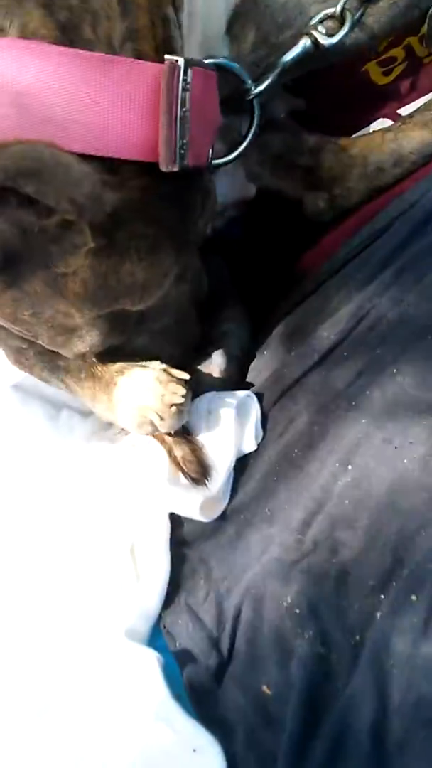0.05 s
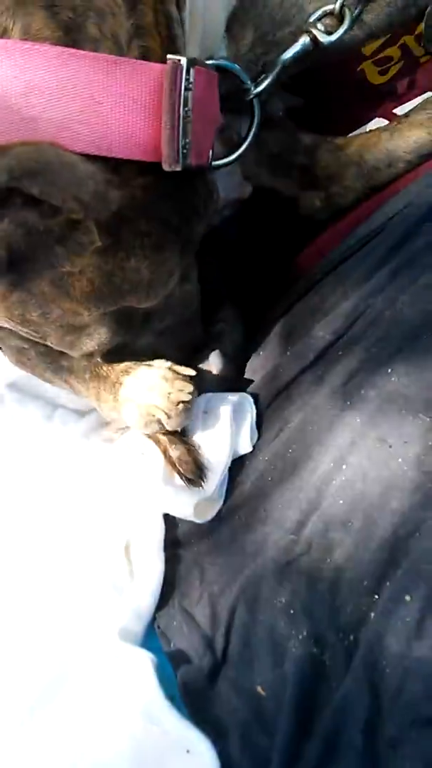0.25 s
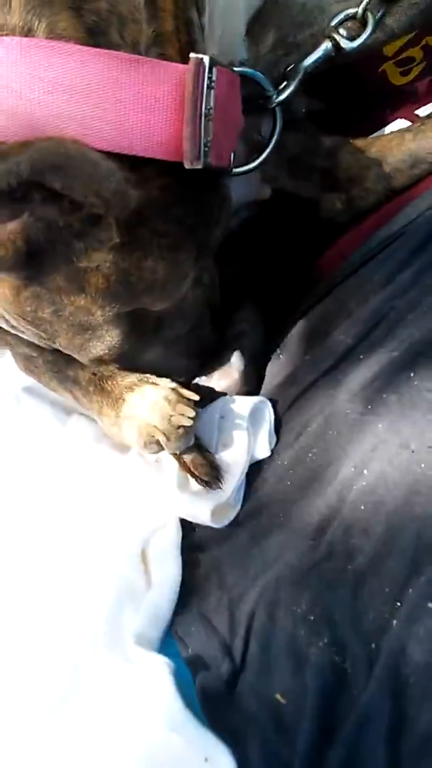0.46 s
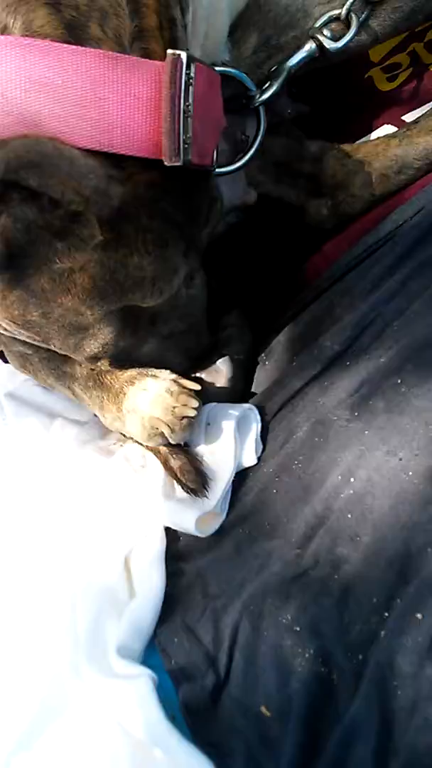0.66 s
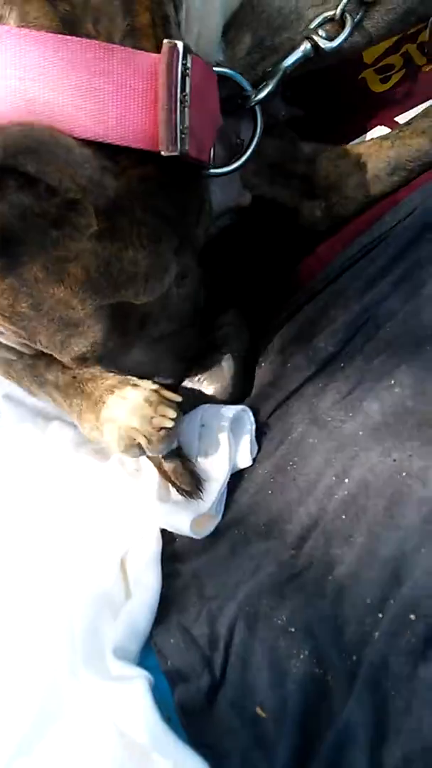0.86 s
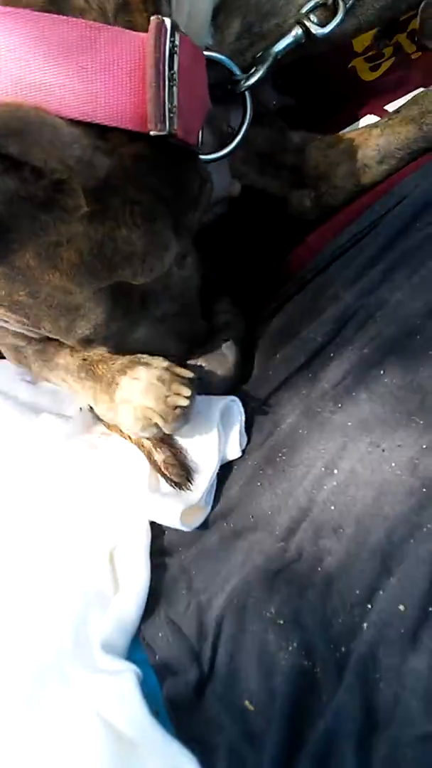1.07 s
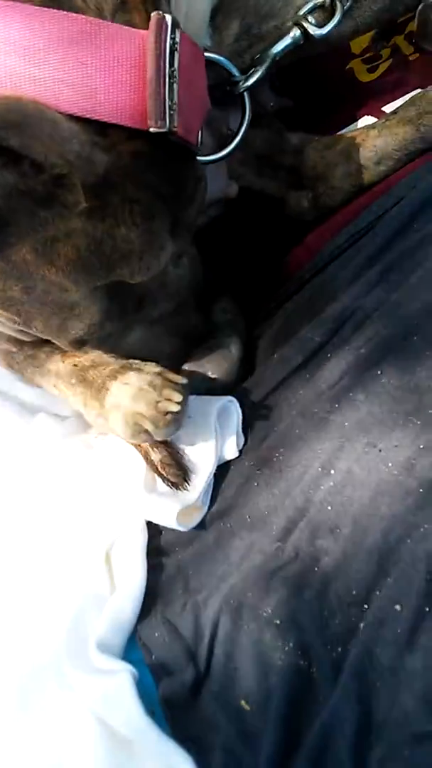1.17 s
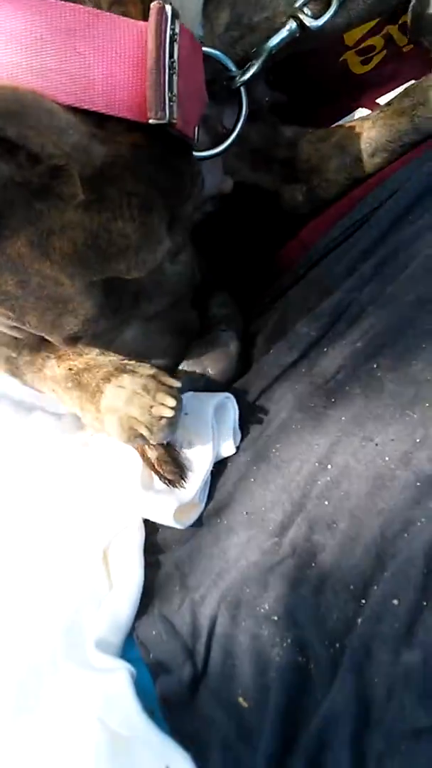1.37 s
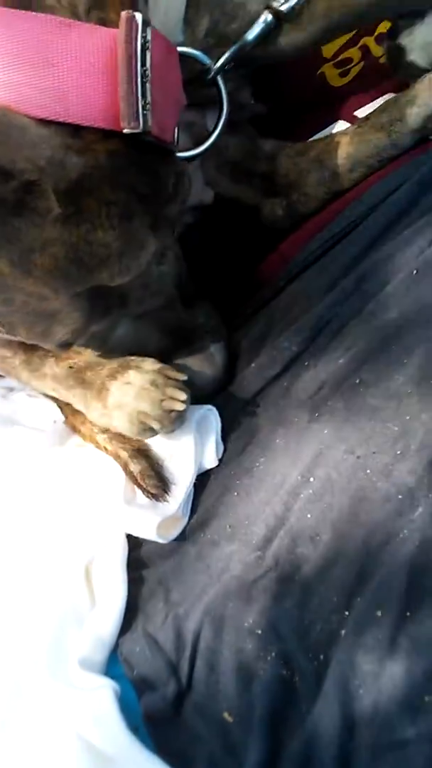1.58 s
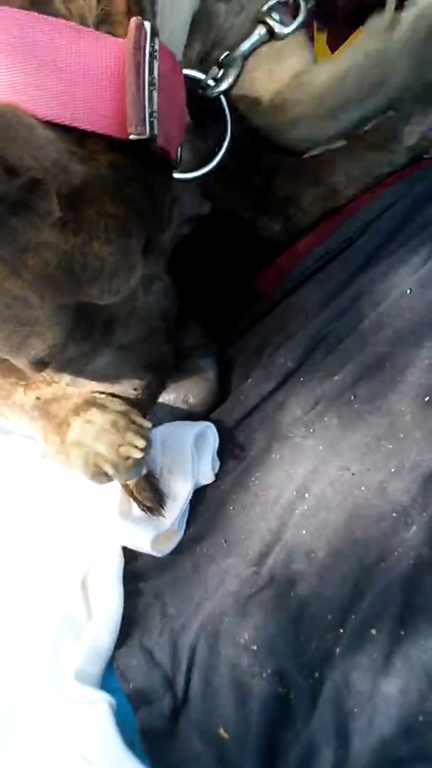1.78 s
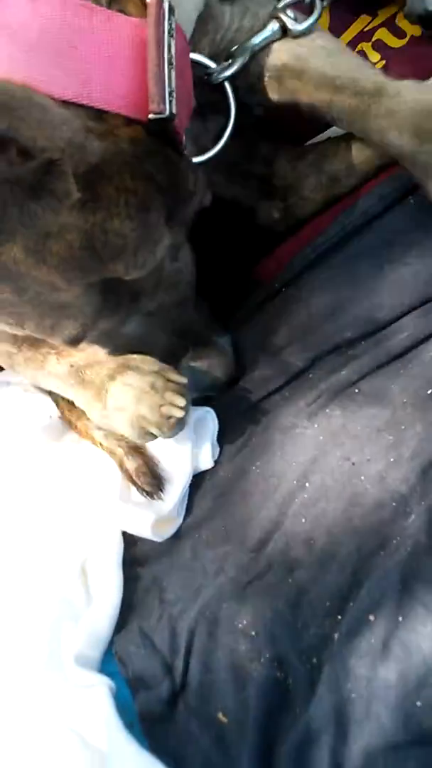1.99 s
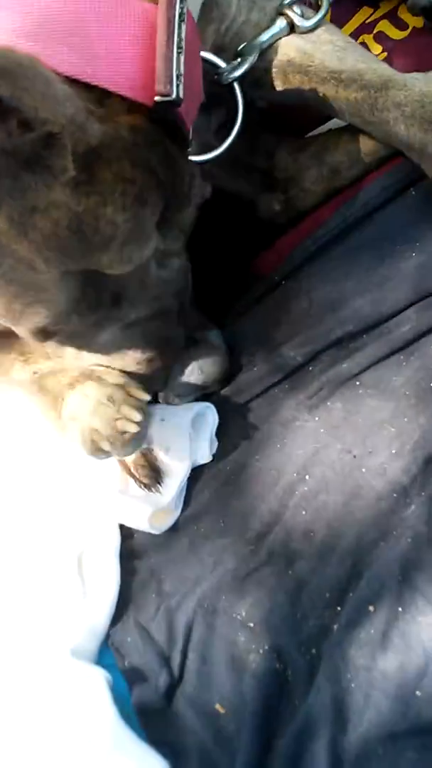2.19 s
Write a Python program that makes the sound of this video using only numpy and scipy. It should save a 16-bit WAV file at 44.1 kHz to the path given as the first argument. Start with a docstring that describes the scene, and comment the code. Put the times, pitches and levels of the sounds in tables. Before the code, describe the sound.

A dog licks very close to a phone microphone in a small damped cabin: wet clicks and hollow mouth pops in separate smacks, short sniffs between, faint birdlike whistles, and low air thumps over steady soft hiss.

```python
"""A dog licks and sniffs a newborn puppy inside a vehicle, close to a phone: slipping tongue clicks (decaying
rings and noise cracks), hollow mouth pops (short swelling tones) and quick sniffs (noise through nose resonances).
Gliding, fluttering sines whistle in a haze of echoes; fainter narrow whistles come and go.
Moving air buffets the microphone in low noise and dull thumps over a steady cabin hiss."""
import sys
import numpy as np
from scipy import signal
from scipy.fft import rfft, irfft, next_fast_len
from scipy.io import wavfile
from scipy.ndimage import uniform_filter1d, map_coordinates

SR = 44100
rng = np.random.default_rng(int(sys.argv[2]) if len(sys.argv) > 2 else 0)


def linear_from_db(decibels):
    """Turn decibels (scalar or array-like) into linear amplitude factors; 0 gives 1."""
    return 10 ** (np.asarray(decibels, float) / 20)


def unload_wav(signal):
    """Save mono or channel-first audio to the path in sys.argv[1] as 16-bit WAV at rate SR, clipped to [-1, 1]."""
    wavfile.write(
        sys.argv[1],
        SR,
        np.round(np.clip(np.atleast_2d(signal).T, -1, 1) * 32767).astype(np.int16),
    )


N = 98607
T = np.arange(N) / SR


def unit(x):
    """Scales x to rms 1."""
    return x / np.sqrt(np.mean(x ** 2) + 1e-20)


def wobble(knots_per_s):
    """Smooth random curve through standard normal knots."""
    knots = rng.standard_normal(int(N * knots_per_s / SR) + 4)
    return map_coordinates(knots, [T * knots_per_s])


def filtered(x, response):
    """Applies a zero-phase gain, a function of frequency in Hz."""
    size = next_fast_len(len(x) + 4096)
    spectrum = rfft(x, size) * response(np.fft.rfftfreq(size, 1 / SR))
    return irfft(spectrum, size)[:len(x)]


def coloured(points):
    """Noise of rms 1 shaped by (frequency [Hz], relative level [dB]) points on a log frequency axis."""
    point_hz, point_db = np.transpose(points)

    def response(hz):
        return linear_from_db(np.interp(np.log(hz + 1), np.log(point_hz + 1), point_db, -120, -120))

    return unit(filtered(rng.standard_normal(N), response))


def add(out, start_s, x):
    """Mixes x into out from start_s."""
    part = out[max(round(start_s * SR), 0):][:len(x)]
    part += x[:len(part)]


def swells(rows, lead, rough_rad):
    """Tones under bell-shaped swells with wandering phase; lead is the share of length before the row's time."""
    out = np.zeros(N)
    for time_s, db, hz, length_s in rows:
        t = T - time_s - (0.5 - lead) * length_s  # zero at the swell's middle
        bell = np.exp(-2 * (t / length_s * 2.3) ** 2)
        out += linear_from_db(db) * bell * np.cos(2 * np.pi * hz * t + rough_rad * wobble(hz / 4))
    return out


def sniffs():
    """Grainy air noise through the nose's resonances, which rise as it opens."""
    # sniffs: (start [s], hold before the fall [s], level [dB], nose pitch factor, lowest resonance boost [dB])
    sniff_rows = [(0, 0.0066, -32, 0.94, -0.5), (0.346, 0.017, -47, 0.89, -16),
                  (0.732, .011, -36.5, 0.8, -14), (0.956, 0.015, -37, 0.99, -3),
                  (1.028, 0.022, -32.5, 0.93, -6.5), (1.105, 0.015, -28.5, 0.97, -15),
                  (1.145, 0.0077, -36, 0.84, -27), (1.175, 0.018, -29, 0.98, -7.5),
                  (1.204, 0.036, -43.5, 1.06, 8.5), (1.264, 0.017, -27, 0.94, -8),
                  (1.575, 0.017, -47.5, 1.03, -2), (1.606, 0.0085, -35.5, 0.96, -1.5),
                  (1.661, 0.0026, -33.5, 1.11, 0), (1.677, 0.021, -35.5, 0.66, -0.5),
                  (1.681, 0.024, -41, 1.27, -24), (1.707, 0.014, -41.5, 0.91, 15),
                  (2.029, 0.011, -34.5, 0.905, 5), (2.114, 0.0034, -42, 1.36, -10),
                  (2.129, 0.017, -46, 1.19, 4)]
    # nose resonances at pitch factor 1: (frequency [Hz], -6 dB width [Hz], gain [dB])
    nose_rows = [(2394, 610, 4.5), (3900, 960, 8), (5805, 400, 2), (7100, 450, -5.5), (9220, 600, -5),
                 (10100, 790, -3), (11600, 2300, -17)]
    start_pitch, glide_s = 0.768, 0.0043
    grain_db, grain_samples = 2.5, 70
    rise_s, fall_s, tail_db, tail_s = 0.0059, 0.0055, -8, 0.038
    out, t = np.zeros(N), T[:8192]
    early = np.exp(-t / glide_s)
    for start_s, hold_s, db, pitch, low_db in sniff_rows:
        gains = linear_from_db(np.array(nose_rows)[:, 2] + low_db * (np.arange(len(nose_rows)) == 0))

        def nose(factor):
            def response(hz):
                power = 0
                for (centre_hz, width_hz, _), gain in zip(nose_rows, gains):
                    offset = (hz - centre_hz * factor) / (width_hz / 2)
                    power = power + gain ** 2 / (1 + offset ** 2) ** 2
                return np.sqrt(power)
            return response

        grain = unit(uniform_filter1d(rng.standard_normal(len(t)), size=grain_samples))
        air = rng.standard_normal((2, len(t))) * linear_from_db(grain_db * grain)
        opening = filtered(air[0], nose(pitch * start_pitch))
        opened = filtered(air[1], nose(pitch))
        breath = np.sqrt(early) * opening + np.sqrt(1 - early) * opened
        after = np.maximum(t - hold_s, 0)
        fall = np.exp(-after / fall_s) + linear_from_db(tail_db) * np.exp(-after / tail_s)
        add(out, start_s, linear_from_db(db) * np.minimum(t / rise_s, 1) * fall * unit(breath))
    return out


def buffet():
    """Moving air on the microphone: two bands of low noise with uneven levels."""
    # buffeting: (time [s], deep level [dB], body level [dB])
    buffet_rows = [(0.0, -43, -44), (0.06, -31, -48), (0.09, -31, -23), (0.1, -10.5, -23),
                   (0.17, -27.5, -46.5), (0.35, -38.5, -48), (0.38, -28, -50), (0.45, -40.5, -45),
                   (0.5, -33.5, -40), (0.57, -45.5, -44.5), (0.6, -30, -59), (0.71, -48, -42),
                   (0.75, -35, -51), (0.861, -39, -54), (0.921, -21, -28.5), (0.96, -25, -39.5),
                   (1.14, -38.5, -54), (1.27, -24.5, -52), (1.319, -28.5, -48), (1.39, -24.5, -46),
                   (1.42, -22, -35), (1.44, -25.5, -42.5), (1.489, -19, -27), (1.53, -32, -32),
                   (1.56, -25, -30.5), (1.73, -29.5, -45.5), (1.82, -35, -40), (2.05, -37.5, -44.5),
                   (2.06, -32, -39.5), (2.24, -32.5, -39)]
    # deep spectrum: (frequency [Hz], relative level [dB])
    deep_colour = [(22, -24), (35, -2), (55, 6), (80, -4), (120, -4.5), (160, -38)]
    # body spectrum: (frequency [Hz], relative level [dB])
    body_colour = [(110, -5.5), (150, 3), (220, -6.5), (320, -12.5), (450, -16.5), (600, -25)]
    time_s, deep_db, body_db = np.transpose(buffet_rows)
    deep = linear_from_db(np.interp(T, time_s, deep_db) + 2.7 * wobble(14)) * coloured(deep_colour)
    body = linear_from_db(np.interp(T, time_s, body_db) + 3.16 * wobble(29.76)) * coloured(body_colour)
    return deep + body


def thumps():
    """Single dull thumps of air on the microphone, as low swelling tones."""
    # thumps: (middle [s], peak level [dB], frequency [Hz], length [s])
    thump_rows = [(0.0594, -18.5, 72, 0.066), (0.0778, -9.5, 62, 0.052), (0.0972, -8, 81, 0.034),
                  (0.087, -11, 151.4, 0.0078), (.125, -16.5, 56, 0.026), (0.34, -24, 52, 0.026),
                  (0.085, -18, 255, 0.0085), (.918, -12.5, 120, 0.02), (.917, -15.5, 203, 0.0081),
                  (1.415, -26, 214, 0.033), (1.4, -27, 238.4, 0.016), (.945, -14, 96, 0.019),
                  (1.42, -8.5, 82, 0.029), (1.47, -15, 70, 0.012), (1.49, -16.5, 143, 0.063),
                  (1.525, -16, 120, 0.028), (1.553, -18, 114, 0.032), (1.582, -12.5, 64, 0.024),
                  (1.67, -19, 59, 0.089)]
    return swells(thump_rows, 0.502, rough_rad=0.28)


def hiss():
    """Cabin air and microphone noise, split into two bands whose levels drift separately."""
    # whole hiss spectrum: (frequency [Hz], relative level [dB])
    hiss_colour = [(190, -8.5), (330, -5), (605, -4), (956, -9.5), (1130, -9.5), (1700, -14), (1930, -11),
                   (2680, -22.5), (3660, -22), (4600, -22), (5080, -23.5), (7040, -29), (8100, -22.5),
                   (9700, -24.5), (10800, -35), (15500, -42.5), (16500, -44)]
    # lower band: (time [s], level [dB])
    lower_rows = [(0.0, -44.5), (0.27, -47), (0.81, -45.5), (1.14, -42), (1.39, -45), (1.63, -48),
                  (1.77, -44.5), (1.93, -47.5), (2.24, -43.5)]
    # treble band: (time [s], level [dB])
    treble_rows = [(0.0, -56), (0.06, -46.5), (0.32, -52), (1.01, -54), (1.16, -42), (1.39, -51.5),
                   (1.63, -51.5), (1.77, -48.5), (1.95, -50.5), (2.24, -48)]
    split_hz = 5000
    air = coloured(hiss_colour)
    treble = filtered(air, lambda hz: 1 / (1 + (split_hz / (hz + 1)) ** 6))

    def drift(rows):
        return linear_from_db(np.interp(T, *np.transpose(rows)) + 0.47 * wobble(24.84))

    return drift(lower_rows) * unit(air - treble) + drift(treble_rows) * unit(treble)


def clicks():
    """The wet tongue tears free in two slips: mouth rings, a higher ring at the tip and a noise crack."""
    # clicks: (time [s], level [dB], mouth ring [Hz], tip ring [Hz],
    #          tip level before tip_lift_db [dB], crack level before crack_lift_db [dB])
    click_rows = [(0.023, -30.5, 580, 5250, -0.5, -31), (0.046, -23.5, 1610, 4530, -35, -31),
                  (0.072, -14, 2090, 5440, -20, -37), (0.077, -18, 1500, 5060, -22, -34),
                  (0.107, -31, 523, 5380, -38, -5), (0.111, -11.5, 660, 5000, -42, -41),
                  (0.362, -38.5, 740, 3590, -0.5, -18), (0.428, -25, 1660, 4770, -14.5, -20),
                  (0.442, -34, 1680, 4600, -34, -27), (0.451, -12.5, 1340, 8000, -42, -29),
                  (0.455, -7.5, 1530, 5390, -26.5, -9), (0.46, -20, 550, 4020, -22.5, -19),
                  (0.474, -8.5, 990, 5610, -32, -24), (0.737, -36, 604, 3380, -32, -1),
                  (0.767, -36.5, 2300, 5810, 1.5, 6), (0.803, -23, 2230, 5070, -12.5, -7),
                  (0.811, -14, 1810, 4470, -31, -36), (0.818, -9, 645, 5260, -21, -13.5),
                  (1.218, -22.5, 497, 5120, -14, -15), (1.228, -6, 710, 5600, -32, -14.5),
                  (1.244, -6.5, 2014, 5190, -24, -11), (1.246, -11.5, 1580, 3600, -21.5, -27),
                  (1.64, -32.5, 764, 4430, -11, 2), (1.666, -17.5, 770, 4500, -22, -32),
                  (1.675, -22.5, 550, 4500, -20, -25), (1.839, -37, 500, 4550, -24, 9),
                  (1.978, -32.5, 1770, 3350, -17, -4), (2.037, -34, 2140, 5100, -6, -30),
                  (2.08, -42, 600, 4620, -2, -18), (2.086, -24.5, 590, 4480, -16, -32)]
    slips, slip_gap_s, slip_step_db = 2, 0.0012, 15.5  # the last slip is the loudest
    rise_s, mouth_rise_s, tip_rise_s = 0.00026, 0.00027, 0.0007
    high_mouth_hz, low_mouth_t60_s, high_mouth_t60_s = 1100, 0.0095, 0.014
    upper_ratio, under_ratio, partial_db = 1.62, 0.463, -8
    tip_lift_db, tip_t60_s = 19, 0.014
    crack_lift_db, crack_t60_s, crack_foot_hz, crack_top_hz = 10.5, 0.0062, 3800, 10300
    out, t = np.zeros(N), T[:2048]
    rise = 1 - np.exp(-t / rise_s)

    def crack_band(hz):
        return 1 / (1 + (hz / crack_top_hz) ** 8) / (1 + (crack_foot_hz / (hz + 1)) ** 6)

    for time_s, db, mouth_hz, tip_hz, tip_db, crack_db in click_rows:
        is_low = mouth_hz < high_mouth_hz
        mouth_t60_s = low_mouth_t60_s if is_low else high_mouth_t60_s
        ratio = upper_ratio if is_low else under_ratio
        for k in range(slips):
            bend = np.exp(rng.normal(0, 0.061))
            main = np.sin(2 * np.pi * mouth_hz * bend * t)
            partial = linear_from_db(partial_db) * np.sin(2 * np.pi * ratio * mouth_hz * t / bend)
            mouth = linear_from_db(-60 * t / mouth_t60_s) * (1 - np.exp(-t / mouth_rise_s)) * (main + partial)

            phase_walk = np.cumsum(rng.normal(0, 0.27, len(t)))
            tip = np.sin(2 * np.pi * tip_hz * bend * t + phase_walk)
            tip *= linear_from_db(tip_db + tip_lift_db - 60 * t / tip_t60_s) * (1 - np.exp(-t / tip_rise_s))

            crack = filtered(np.diff(rng.standard_normal(len(t) + 1)), crack_band)
            crack *= linear_from_db(crack_db + crack_lift_db - 60 * t / crack_t60_s)

            slip_s = time_s + slip_gap_s * k * rng.uniform(0.63, 1.3)
            gain = linear_from_db(db - slip_step_db * (slips - 1 - k))
            add(out, slip_s, gain * rise * (mouth + tip + crack))
    return out


def thin_whistles():
    """Faint narrow whistles in the background air: sines with jittered pitch and wavering level."""
    # thin whistles: (start [s], end [s], mean frequency [Hz], mean level [dB])
    thin_rows = [(0.095, 0.327, 7960, -52), (0.623, 0.67, 5800, -49.5), (1.383, 1.54, 1940, -55.5),
                 (2.13, 2.21, 1987, -54.5)]
    pitch_spread, jitter_knots_per_s, fade_s = 0.035, 700, 0.0093
    out = np.zeros(N)
    for start_s, end_s, hz, db in thin_rows:
        fade = np.clip(np.minimum(T - start_s, end_s - T) / fade_s, 0, 1)
        pitch_hz = hz + pitch_spread * hz * wobble(jitter_knots_per_s)
        tone = np.sin(2 * np.pi * np.cumsum(pitch_hz) / SR)
        out += linear_from_db(db + 6.6 * wobble(60.6)) * fade * tone
    return out


def whistles():
    """Gliding, fluttering sines, perhaps birds outside, each trailing a decaying noise haze of echoes."""
    # one list per whistle: (time [s], pitch before wander [Hz], level before flutter [dB])
    whistle_rows = [
        [(.30, 4480, -58), (.315, 4380, -42.5), (.345, 3920, -44.5), (.365, 3660, -53), (.378, 3620, -55)],
        [(.343, 2700, -52), (.36, 2800, -43), (.372, 2820, -50)],
        [(.632, 2950, -59), (.644, 3030, -46), (.652, 3050, -56)],
        [(.646, 3560, -47), (.654, 3900, -41), (.66, 4870, -32.5), (.667, 5480, -38.5), (.675, 4840, -33),
         (.682, 4070, -24.5), (.69, 3520, -45), (.70, 3340, -33), (.71, 3130, -51)],
        [(.655, 4250, -44), (.662, 3860, -37), (.672, 3960, -54)],
        [(.678, 2965, -50), (.688, 2983, -44), (.70, 2900, -62), (.713, 2977, -48), (.722, 3005, -34),
         (.732, 3230, -45), (.743, 3176, -35), (.755, 2830, -47)],
        [(.745, 4060, -47), (.757, 4200, -38), (.767, 4610, -40), (.778, 4300, -46), (.795, 4400, -49)],
        [(.815, 4360, -41), (.835, 3980, -44), (.86, 4400, -66)],
        [(.94, 3080, -57), (.96, 3800, -48), (1.0, 4400, -44.5), (1.03, 4500, -44), (1.08, 4400, -54)],
        [(1.275, 4050, -27), (1.31, 3900, -68), (1.37, 3600, -55)],
        [(1.578, 3900, -50), (1.592, 3420, -39), (1.62, 3760, -67), (1.655, 4510, -42), (1.67, 4300, -50)],
        [(1.79, 4410, -48), (1.805, 4250, -43), (1.822, 3800, -51), (1.84, 4380, -44)],
        [(1.842, 4650, -48), (1.862, 4470, -40), (1.88, 4650, -49), (1.94, 4560, -48), (1.97, 4520, -47)],
        [(1.832, 3030, -49), (1.85, 2750, -50), (1.868, 2740, -58), (1.89, 2880, -56)],
        [(1.862, 3950, -47), (1.872, 3530, -44), (1.89, 3800, -44), (1.92, 3964, -29.5), (1.935, 4100, -39),
         (1.96, 3560, -55), (2.0, 3650, -46)],
        [(1.89, 3246, -48), (1.905, 3560, -33.5), (1.915, 3150, -41), (1.94, 2970, -47), (1.952, 2620, -47),
         (1.985, 2655, -53.5)],
    ]
    wander_hz, wander_knots_per_s = 70, 70
    rough_hz, rough_knots_per_s = 115, 700
    flutter_db, flutter_knots_per_s = 5, 130
    fade_s, echo_t60_s, echo_db = 0.0037, 0.23, -3.5
    out = np.zeros(N)
    for rows in whistle_rows:
        time_s, hz, db = np.transpose(rows)
        fade = np.clip(np.minimum(T - time_s[0], time_s[-1] - T) / fade_s, 0, 1)
        wander = wander_hz * wobble(wander_knots_per_s) + rough_hz * wobble(rough_knots_per_s)
        pitch_hz = np.interp(T, time_s, hz) + wander
        level_db = np.interp(T, time_s, db) + flutter_db * wobble(flutter_knots_per_s)
        out += fade * linear_from_db(level_db) * np.sin(2 * np.pi * np.cumsum(pitch_hz) / SR)
    tail = rng.standard_normal(SR // 2) * linear_from_db(-60 * T[:SR // 2] / echo_t60_s)
    return out + linear_from_db(echo_db) * signal.fftconvolve(out, tail / np.linalg.norm(tail))[:N]


def pops():
    """Hollow pops of the closing mouth, as short swelling tones."""
    # pops: (start [s], peak level [dB], frequency [Hz], length [s])
    pop_rows = [(.302, -32.5, 647, 0.011), (.478, -20.5, 720, 0.0069), (.483, -24.5, 742, 0.0094),
                (.693, -39, 707, 0.032), (.728, -32.5, 682, .012), (.824, -27.5, 597, 0.0096),
                (1.015, -30.5, 699, 0.031), (1.05, -36, 811, 0.033), (1.223, -18, 560, 0.0072),
                (1.228, -19, 746, 0.0074), (1.236, -22, 957, 0.0049), (1.674, -31.5, 474, 0.00985),
                (.469, -22.5, 620, 0.0044), (1.61, -36, 650, 0.028), (1.69, -32, 796, .012)]
    return swells(pop_rows, 0, rough_rad=0.61)


def cabin(x):
    """Adds the short, damped answer of seats and glass: decaying noise after a 2 ms gap."""
    t60_s, answer_db, gap_s = 0.07, -12, 0.002
    t = T[:6000]
    tail = rng.standard_normal(len(t)) * linear_from_db(-60 * t / t60_s) * (t > gap_s)
    return x + linear_from_db(answer_db) * signal.fftconvolve(x, tail / np.linalg.norm(tail))[:N]


def scene():
    """The dog in the cabin, whistles, air on the microphone and hiss."""
    dog = sniffs() + clicks() + pops()
    air = buffet() + thumps() + hiss()
    return (cabin(dog) + air + thin_whistles() + whistles())[None]


def roll_off(x):
    """The treble ends steeply here."""
    return signal.sosfilt(signal.butter(12, 17060, fs=SR, output="sos"), x)


def record(dry):
    """The phone's microphone drops the deepest bass."""
    foot_hz = 37.3
    heard = filtered(dry[0], lambda hz: 1 / (1 + (foot_hz / (hz + 1)) ** 4))
    return roll_off(heard[None])


dry = scene()
out = record(dry)
unload_wav(out)
```